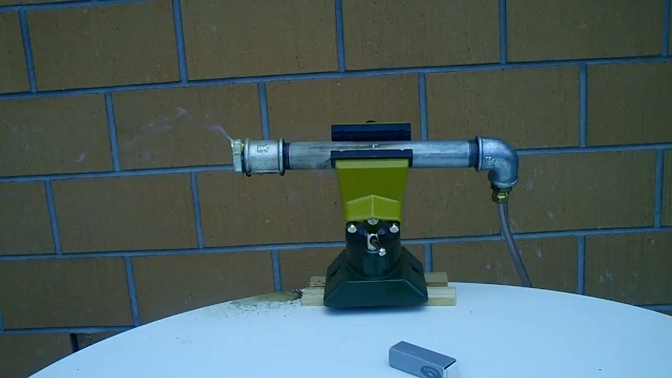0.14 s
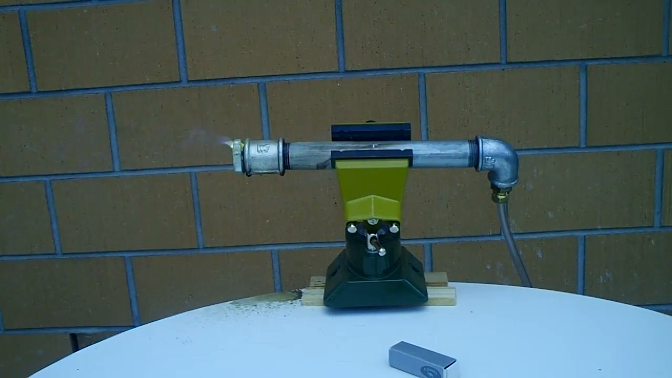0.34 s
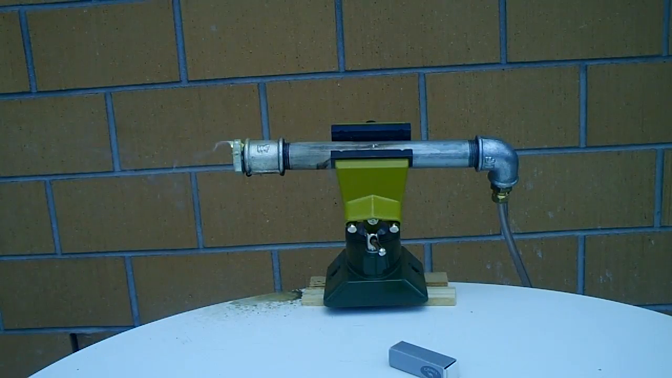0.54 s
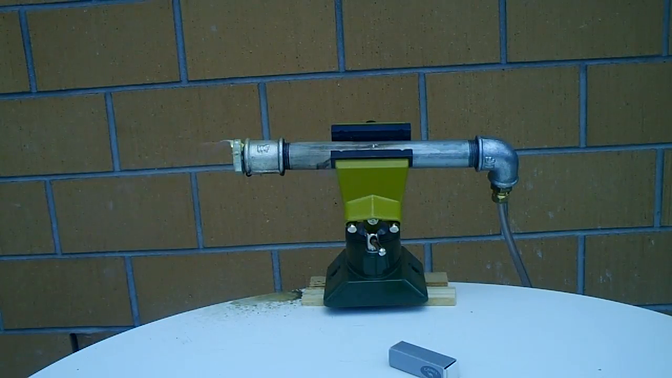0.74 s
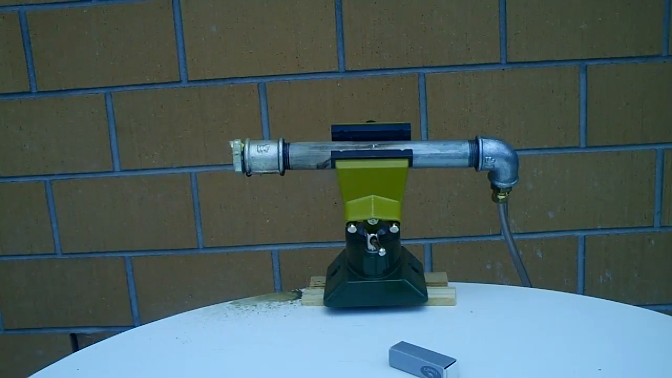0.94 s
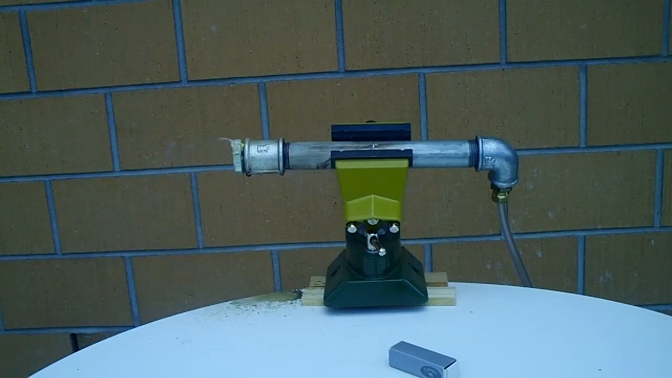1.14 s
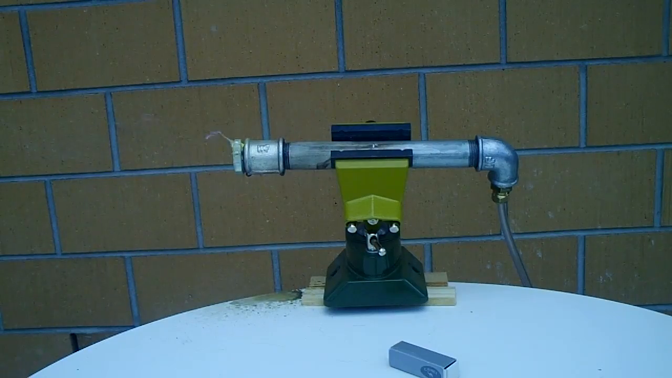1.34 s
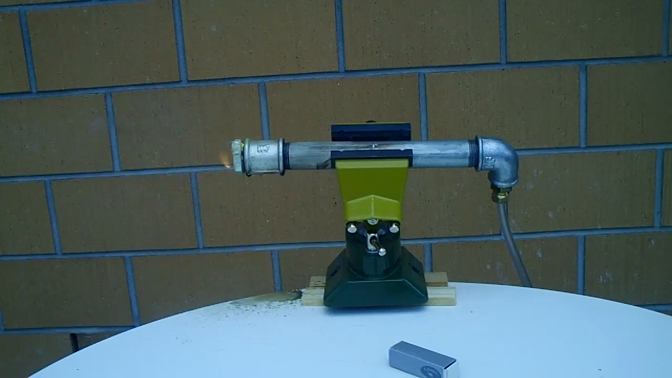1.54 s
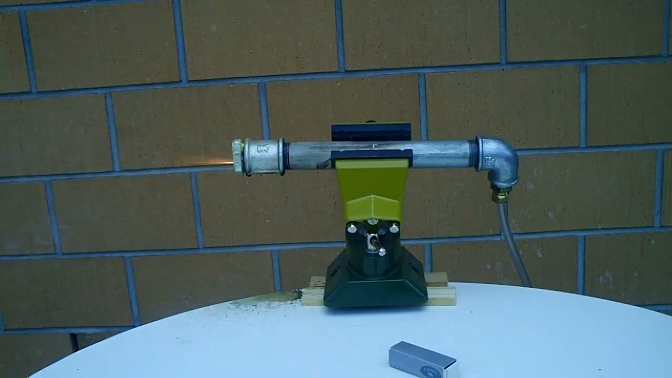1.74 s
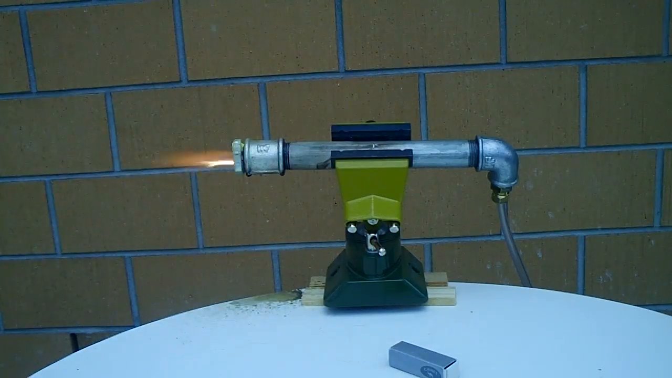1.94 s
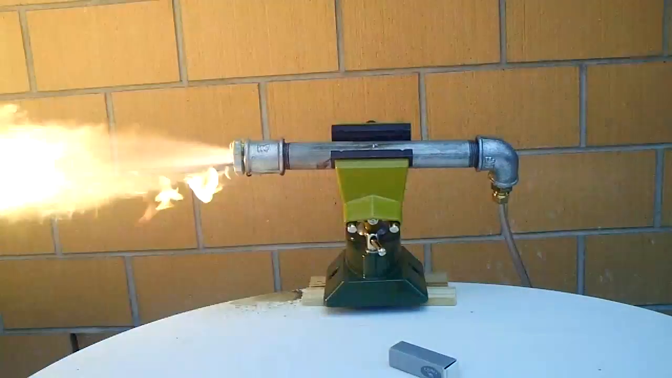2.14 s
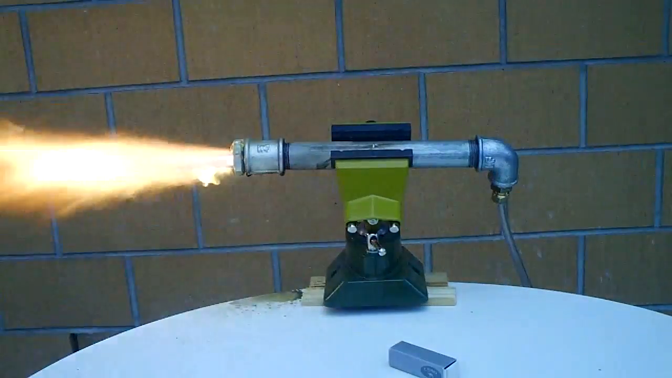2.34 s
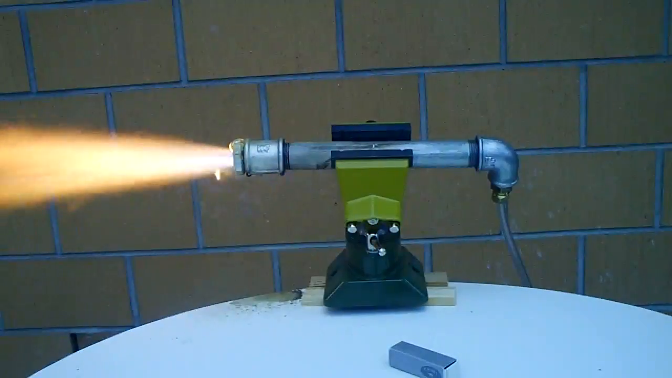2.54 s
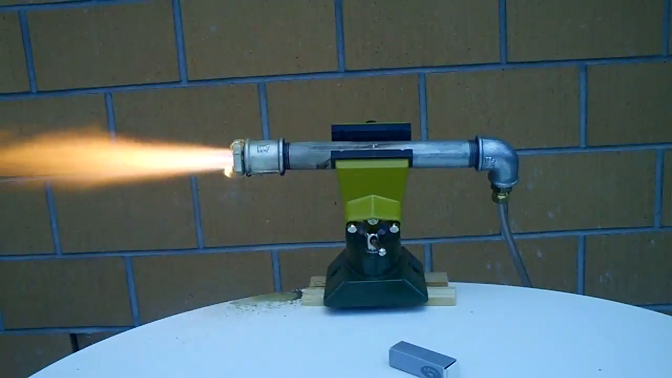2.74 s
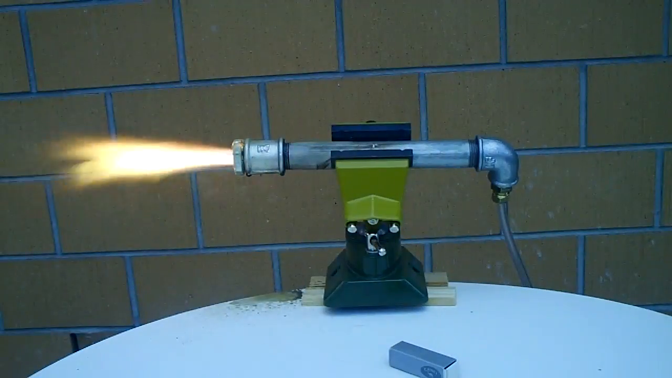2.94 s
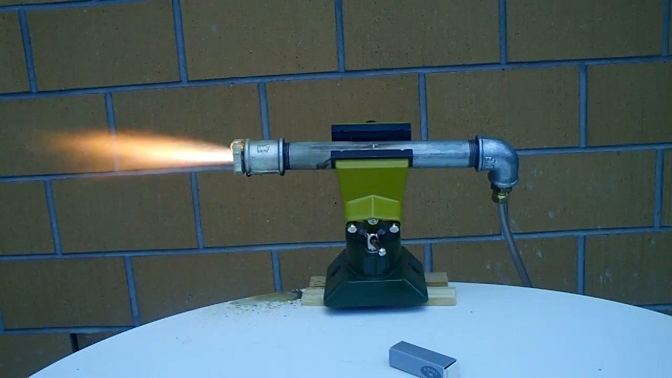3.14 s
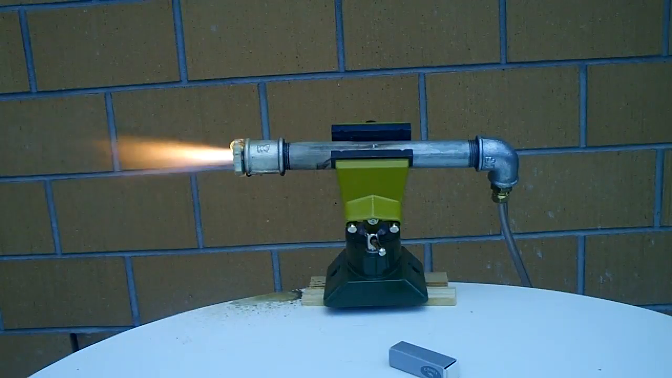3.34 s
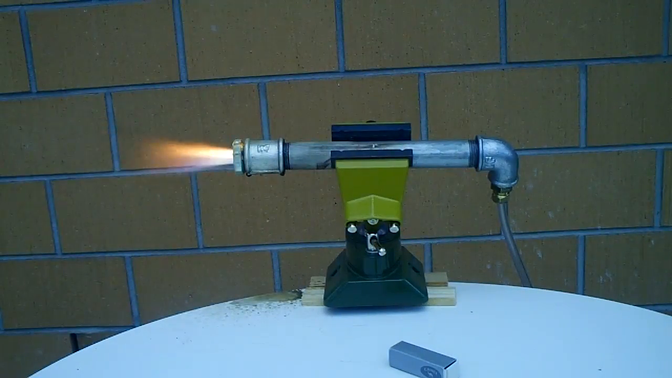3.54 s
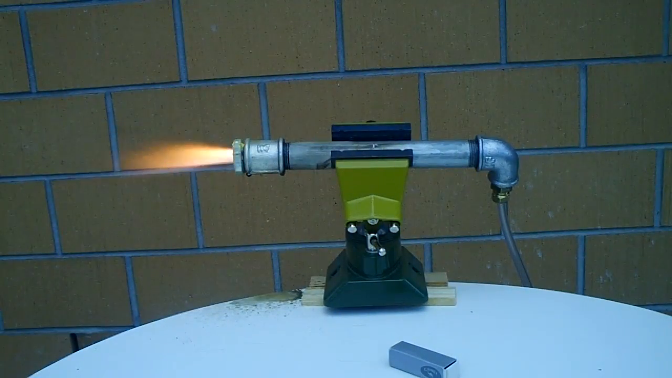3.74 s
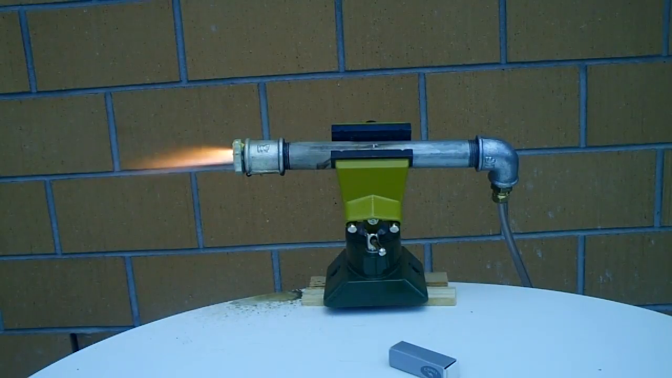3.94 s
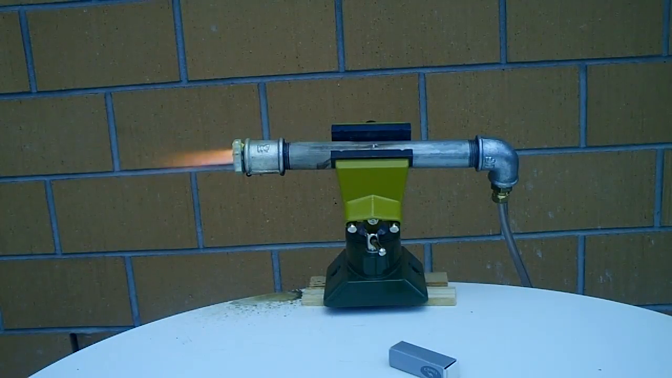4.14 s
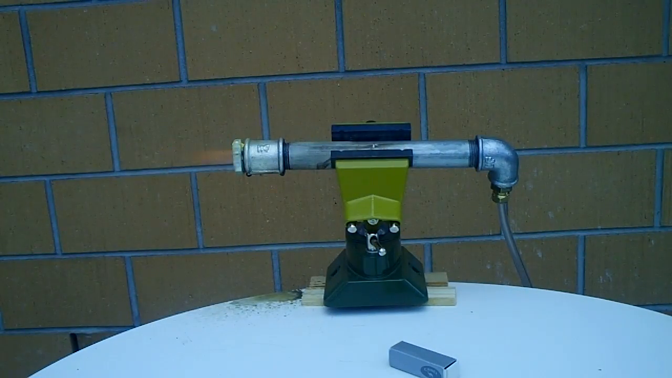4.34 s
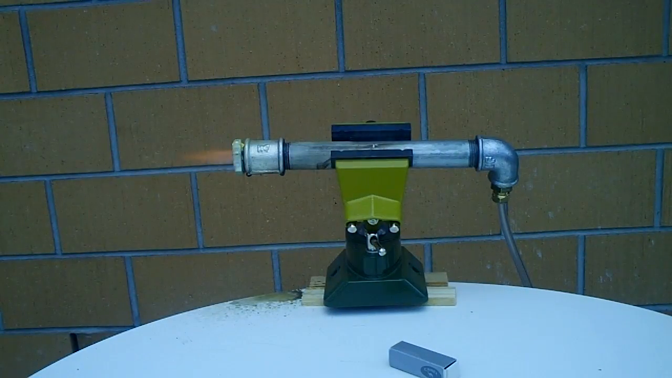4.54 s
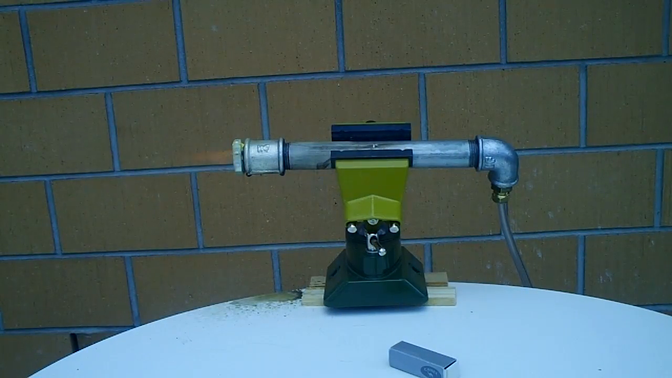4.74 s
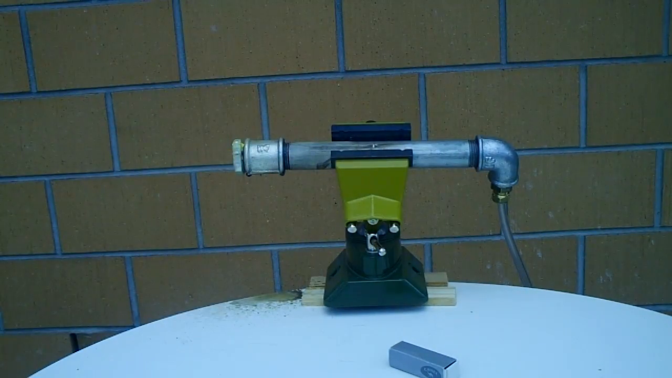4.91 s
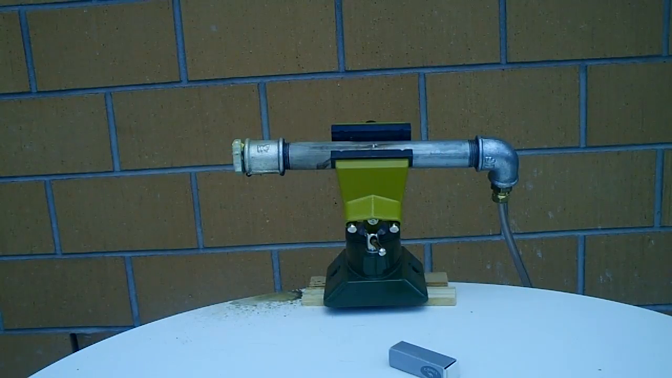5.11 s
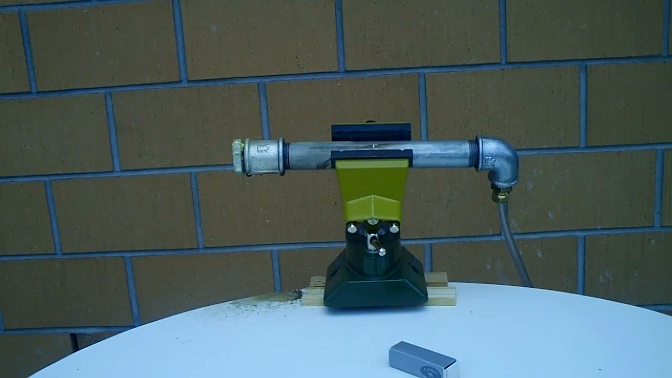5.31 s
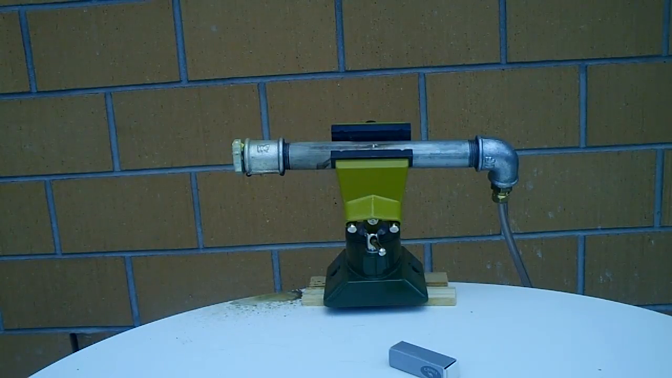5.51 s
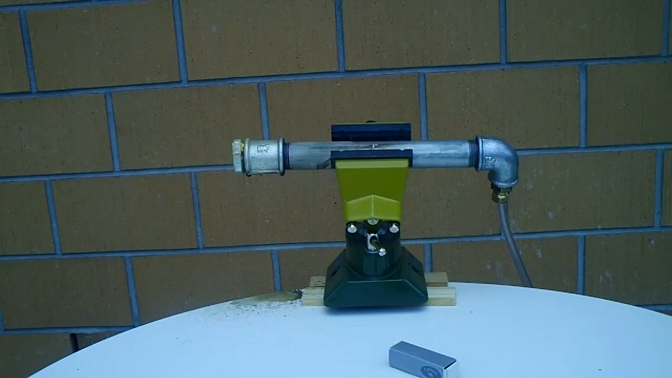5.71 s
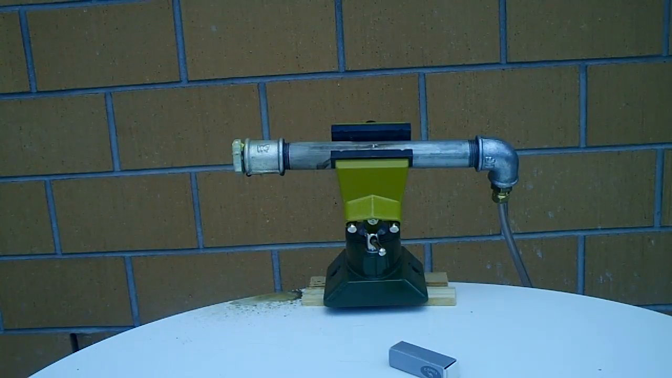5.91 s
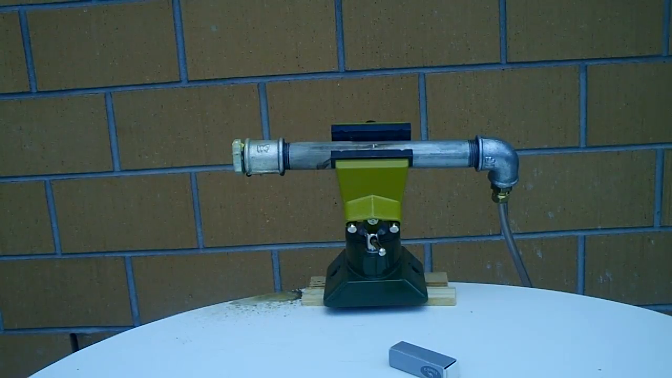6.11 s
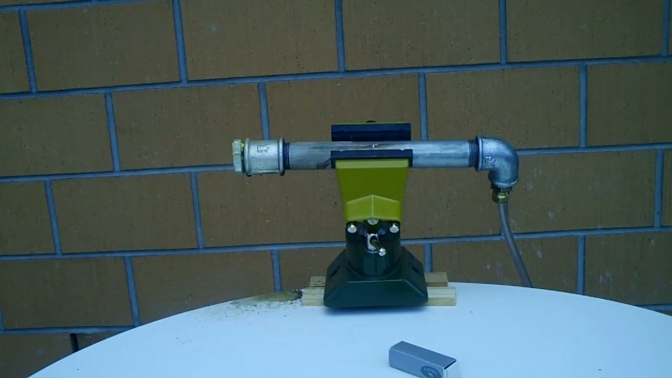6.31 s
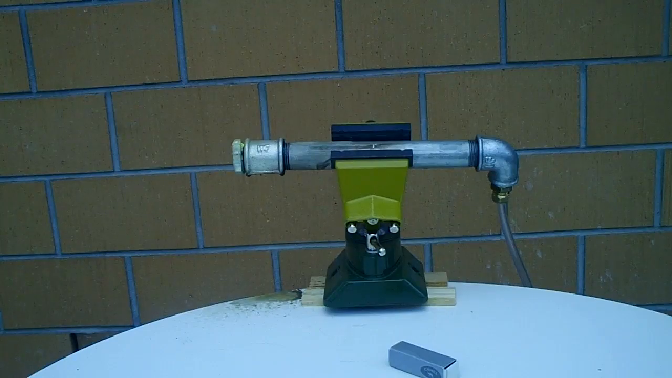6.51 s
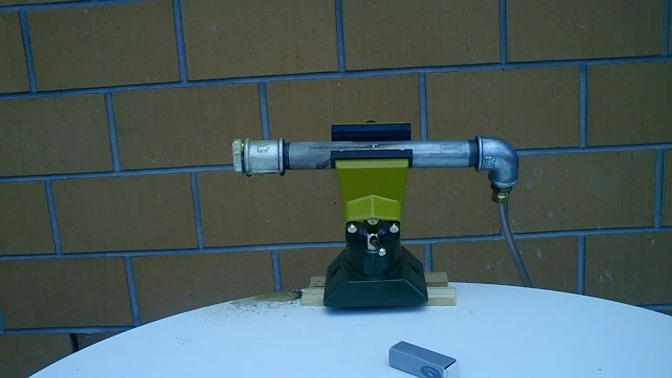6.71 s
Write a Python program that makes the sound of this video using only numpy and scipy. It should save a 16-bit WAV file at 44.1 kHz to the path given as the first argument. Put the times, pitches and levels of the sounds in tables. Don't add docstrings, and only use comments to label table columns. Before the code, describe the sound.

Outdoors by a brick wall, quiet far traffic with a soft knock and faint fuse ticks. A breathy gas hum builds, then a low puff, quick cracking pops and short whistles lead into a full roaring, hissing jet. Very close to a small mono microphone, it overloads and distorts. The blast weakens and flutters, its whistling note sinking, then it cuts off with a few breathy gasps.

```python
import sys
import numpy as np
from scipy import signal
from scipy.fft import rfft, irfft, next_fast_len
from scipy.io import wavfile
from scipy.ndimage import uniform_filter1d, map_coordinates

SR = 44100
rng = np.random.default_rng(int(sys.argv[2]) if len(sys.argv) > 2 else 0)


def ratio_of_db(decibels):
    return 10 ** (np.asarray(decibels, float) / 20)


def waveform_to_disk(signal):
    frames = np.transpose(np.atleast_2d(signal))
    scaled = np.clip(frames, -1, 1) * 32767
    samples = np.round(scaled).astype(np.int16)
    wavfile.write(sys.argv[1], SR, samples)


N = 298116
TIME = np.arange(N) / SR

# time in seconds, gas flow in dB, flame size in dB.
BURN = [(1.6, -89, -77), (1.67, -58, -37), (1.72, -53, -38), (1.745, -47.5, -34), (1.785, -49, -36.5),
        (1.84, -37.5, -19.5), (1.94, -35.5, -16), (2.06, -19, -5.5), (2.12, -4, 1.5), (2.6, 3, 2),
        (3.8, 0.5, -0.5), (4.3, -5, -6.5), (5.3, -8.5, -11.5), (5.96, -10.5, -23.5), (6.06, -16, -25),
        (6.17, -41, -42.5), (6.32, -43, -41), (6.43, -72, -72)]


def exhaust():
    # pitch in Hz, level in dB per Hz.
    flame_colour = [(50, -43.5), (100, -16.5), (260, -3), (430, -5.5), (640, -3.5), (900, -9.5),
                    (1300, -14), (1500, -21), (2600, -18.5), (5000, -30), (11000, -53), (22000, -120)]
    # pitch in Hz, width in Hz, level in dB.
    boom = [(262, 18, -4.5), (523.5, 55, -1.5), (632, 39, 1), (882, 77, 2)]
    # pitch in Hz, level in dB per Hz.
    hiss_colour = [(700, -120), (900, -20), (1500, -8.5), (2600, -8), (3100, -2.5), (4160, -9), (4670, -7),
                   (5500, -2.5), (7000, -8.5), (8800, -0.5), (10300, -3.5), (11000, -3.5), (22000, -120)]
    # pitch in Hz, width in Hz, level in dB.
    nozzle = [(2770, 33, -7.5), (3643, 60, -2), (4743, 28, 4.5), (5330, 120, -3), (5706, 50, 0.5),
              (6350, 55, 2.5), (7240, 50, -3.5), (7680, 74, -3), (7940, 40, -1), (8300, 99, -2),
              (8630, 49, -0.5), (8990, 70, -5.5), (9560, 45, -16.5), (10300, 110, -1.5)]
    # pitch in Hz, width in Hz, level in dB.
    pipe_ring = [(1206.5, 180, -4.5), (2974, 120, -13.5), (931, 160, -7.5)]
    # time in seconds, pitch in Hz, level in dB over the gas flow.
    chamber_note = [(1.7, 2350, 4), (1.9, 2400, -8), (2.1, 2202, -6.5), (3.5, 2250, -4.5), (4.7, 2299, -5),
                    (5.4, 2078, -1.5), (5.85, 1942, -6.5), (5.97, 1780, -13.5), (6.15, 1740, -8.5)]
    # time in seconds, share from 0 to 1.
    cooling = [(4.4, 0), (5.3, 0.97)]

    flow_db, flame_db = curves(BURN)
    cooled = np.clip(np.interp(TIME, *np.transpose(cooling)), 0, 1)
    flare_db = flares()
    sputter_db = (0.6 + 1 * cooled) * wobble(48)
    flicker = wobble(18)
    lumps = ratio_of_db(1.0 * flicker + 1.33 * wobble(70))
    spits = ratio_of_db(0.57 * flicker + 0.8 * wobble(260))

    def roar_tone(f):
        return ratio_of_db(along(flame_colour, f)) * bumps(boom, lift_db=4)(f)

    def hiss_tone(f):
        return ratio_of_db(along(hiss_colour, f)) * bumps(nozzle, lift_db=6)(f)

    roar = ratio_of_db(flame_db + flare_db + sputter_db) * unit(lumps * rush(roar_tone, patchy_db=1.5))
    jet_share = 0.3
    hiss = ratio_of_db(flow_db + jet_share * flare_db) * unit(spits * rush(hiss_tone, patchy_db=1.5))

    ring_db = -6 + 0.93 * flow_db - 5.5 * cooled + 1 * wobble(25)
    ring = unit(lumps * rush(sharp(pipe_ring), patchy_db=1.5)) * (flow_db > -120)

    hot = fuzzy(chamber_note, width_hz=297)
    clear = ratio_of_db(1.2 * wobble(45)) * fuzzy(chamber_note, width_hz=115)
    overtone_db = -10.5 + 12 * np.clip(TIME - 5.6, 0, 1)
    clear = clear + ratio_of_db(overtone_db) * fuzzy(chamber_note, width_hz=130, order=2.87)
    note = lumps * (np.sqrt(1 - cooled) * hot + np.sqrt(cooled) * clear)
    return roar + hiss + ratio_of_db(ring_db) * ring + ratio_of_db(flow_db) * note


def flares():
    # time of the flare in seconds, height in dB.
    flare_events = [(1.845, 7), (1.943, 3.5), (2.11, 3), (2.424, 5.5), (2.678, 4.5), (3.69, 5), (3.75, 2),
                    (4.556, 5), (4.625, 12), (4.78, 5), (4.87, 5.5), (5.084, 3), (5.223, 4.5), (5.278, 3),
                    (5.348, 3.5), (5.458, 5), (5.639, 6), (5.67, 5), (5.712, 9)]
    choke_s, rise_s, fall_s = 0.018, 0.008, 0.022
    choke_share = 0.7
    shape_s = np.array([-2 * choke_s, -choke_s / 2, rise_s, rise_s + fall_s])
    return sum(db * np.interp(TIME - s, shape_s, [0, -choke_share, 1, 0]) for s, db in flare_events)


def pops():
    # time in seconds, peak in dB, thump in dB, crack in dB.
    ignitions = [
        (1.7244, -14, -4, -3.5),
        (1.811, -12.5, -1, -9),
        (1.8313, -9.5, -4, -3),
        (1.851, -2, -2, -11.5),
        (1.877, -10, 4.5, -11.5),
        (1.889, -16, 0, -16.5),
    ]
    push, crack = np.zeros(N), np.zeros(N + SR)
    t = np.arange(SR // 10) / SR
    for s, db, thump_db, crack_db in ignitions:
        start = round(s * SR)
        push[start] = ratio_of_db(db + thump_db + 21.5)
        fade_db = db + crack_db + 6 - 60 * t / 0.035
        crack[start:][:len(t)] += ratio_of_db(fade_db) * rng.standard_normal(len(t))
    # pitch in Hz, width in Hz, level in dB.
    low = [(538, 150, 7), (1170, 79, -14)]
    high = [(1170, 110, 2), (2330, 220, 3), (3000, 150, -10), (5600, 2000, -19), (9000, 3000, -18)]
    return filtered(push, lambda f: modes(low, f)) + filtered(crack[:N], lambda f: modes(high, f))


def puff():
    s, db, hz = (1.664, -19, 70)
    t = np.clip(TIME - s, 0, None)
    rumble = np.sin(2 * np.pi * hz * t) + 0.94 * rush(lambda f: 1 / (1 + (f / 600) ** 4), patchy_db=1.5)
    return ratio_of_db(db - 60 * t / 0.12) * (1 - np.exp(-t / 0.0059)) * rumble


def singing():
    # start in seconds, length in seconds, first pitch in Hz, last pitch in Hz, level in dB.
    sung_notes = [
        (1.565, .045, 920, 790, -50),
        (1.58, .03, 445, 405, -39),
        (1.607, .035, 404, 355, -34),
        (1.722, 0.053, 1166, 1136, -31.5),
        (1.73, .07, 2330, 2300, -48),
        (1.73, .07, 2980, 2980, -50),
        (1.777, .085, 2420, 2450, -38.5),
        (1.795, .065, 1190, 1290, -31),
        (1.957, .075, 1600, 1615, -28),
    ]
    out = np.zeros(N)
    for s, length, from_hz, to_hz, db in sung_notes:
        hz = np.interp(TIME, [s, s + length], [from_hz, to_hz])
        edge_s = 0.012
        gate = np.clip(np.minimum(TIME - s, s + length - TIME) / edge_s + 0.5, 0, 1) ** 2
        turn = 2 * np.pi * np.cumsum(hz * (1 + 0.02 * wobble(90))) / SR
        out += gate * ratio_of_db(db + 3 + 3.5 * wobble(80)) * np.sin(turn)
    return out


def cold_gas():
    # pitch in Hz, width in Hz, level in dB.
    low_modes = [(369, 107, 11), (540, 230, -7), (210, 150, -8)]
    # pitch in Hz, width in Hz, level in dB.
    upper_modes = [(1190, 150, 2), (1870, 150, 2), (2450, 120, -6), (3350, 280, -8)]
    # time in seconds, peak in dB.
    last_gasps = [
        (6.14, -24.5),
        (6.24, -27),
        (6.32, -27),
    ]

    leak_db = -62.5 + 5 * TIME
    hum_from_s, lit_s = 1.28, 1.625
    hum_db = -46.5 - 40 * np.clip(hum_from_s + 0.24 - TIME, 0, None)
    lit_drop_db = 600 * np.clip(TIME - lit_s, 0, 0.2)
    leak = ratio_of_db(np.maximum(leak_db, hum_db) - lit_drop_db)
    gasps = swells(*np.transpose(last_gasps), rise_s=0.065, fall_s=0.072)
    hum = rush(sharp(low_modes), patchy_db=1.5)
    whistle = rush(sharp(upper_modes), patchy_db=1.5)
    return (leak + gasps) * hum + gasps * ratio_of_db(-14) * whistle


def sparks():
    # time in seconds, level in dB, pitch in Hz, seconds to fade by 60 dB.
    ticks = [
        (.229, -64, 7500, .02),
        (.383, -60, 7800, .12),
        (.39, -60, 4930, .1),
        (.895, -53, 5600, .025),
        (1.297, -51.5, 6300, .05),
        (1.325, -60, 5200, .12),
        (6.559, -60, 6450, .03),
    ]
    out, t = np.zeros(N + SR), np.arange(SR // 8) / SR
    for s, db, hz, t60 in ticks:
        burst = np.sin(2 * np.pi * hz * t) * uniform_filter1d(rng.standard_normal(len(t)), size=14)
        envelope = ratio_of_db(db + 10 - 60 * t / t60) * (1 - np.exp(-t * 1500))
        out[round(s * SR):][:len(t)] += envelope * burst
    return out[:N]


def bump():
    s, db, hz = (.13, -43, 105)
    t = np.clip(TIME - s, 0, None)
    return ratio_of_db(db - 60 * t / 0.2) * (1 - np.exp(-t / 0.01)) * np.sin(2 * np.pi * hz * t)


def yard():
    # pitch in Hz, level in dB per Hz.
    traffic_colour = [(35, -51.5), (60, -10), (140, -2), (169, -2.5), (201, -7), (282, -7), (387, -6.5),
                      (579, -15.5), (716, -13.5), (1140, -10), (1710, -30), (2110, -26.5), (3290, -37),
                      (4820, -36.0), (9500, -36.0), (12400, -68), (20900, -120)][:-2] + [(11000, -35.5)]
    # pitch in Hz, level in dB per Hz.
    push_colour = [(5, -39.5), (12, -15), (25, -5), (48, 6.5), (70, -7), (110, -17), (200, -64),
                   (400, -120)]
    # time in seconds, peak in dB, seconds to climb or fall by 20 dB.
    gust_events = [(0, -43, 0.1), (.8, -49, .15), (1.36, -45.5, .2), (1.68, -32.5, 0.12), (1.9, -40, .3),
                   (2.8, -8.5, 0.31), (3.22, -22, 0.2), (3.43, -18, .08), (3.73, -20.5, 0.1),
                   (3.97, -17, 0.2), (4.5, -22.5, 0.13), (4.63, -20, .06), (4.8, -16, 0.14),
                   (5.2, -25.5, .2), (5.5, -26, .05), (5.69, -26.5, 0.02), (6.55, -52, 0.3)]

    traffic_db = YARD_DB = -50.5 - 0.22 * TIME - 1.5 + 0.8 * wobble(2.3)
    traffic = ratio_of_db(traffic_db) * rush(lambda f: ratio_of_db(along(traffic_colour, f)), patchy_db=-0.2)
    s, db, length = np.transpose(gust_events)
    calm = ratio_of_db(-58)
    draught = ratio_of_db(-30.5 + 1.1 * curves(BURN)[0])
    air = calm + draught + swells(s, db, length, length)
    return traffic + air * rush(lambda f: ratio_of_db(along(push_colour, f)), patchy_db=-0.5)


def whine():
    steady = ratio_of_db(-83) * np.sin(2 * np.pi * 5771 * TIME)
    dip = np.clip(np.sin(2 * np.pi * 30 * TIME), 0, 1)
    hz = 10230 - 190 * dip + 25 * wobble(40)
    return steady + ratio_of_db(-74.5) * np.sin(2 * np.pi * np.cumsum(hz) / SR)


def unit(x):
    return x / np.sqrt(np.mean(x ** 2) + 1e-20)


def along(points, hz):
    f, v = np.transpose(points)
    return np.interp(np.log(hz + 1), np.log(f + 1), v)


def curves(rows):
    s, *cols = np.transpose(rows)
    return [np.interp(TIME, s, c, left=-120, right=-120) for c in cols]


def wobble(rate):
    knots = rng.standard_normal(int(N * rate / SR) + 4)
    return map_coordinates(knots, [np.arange(N) * rate / SR])


def filtered(x, response):
    m = next_fast_len(N + SR // 2)
    spectrum = rfft(x, m) * response(np.fft.rfftfreq(m, 1 / SR))
    return irfft(spectrum, m)[..., :N]


def modes(table, f):
    total = 0
    for k, (c, w, db) in enumerate(table):
        damping = 1j * f * w
        total = total + (-1) ** k * ratio_of_db(db) * damping / (c * c - f * f + damping + 1e-9)
    return total


def bumps(table, lift_db):
    return lambda f: np.sqrt(1 + sum(np.abs(ratio_of_db(lift_db) * modes([m], f)) ** 2 for m in table))


def sharp(table):
    def response(f):
        return np.sqrt(sum(ratio_of_db(db) ** 2 * np.abs(modes([(c, w, 0)], f)) ** 4 for c, w, db in table))
    return response


def rush(response, patchy_db):
    z = signal.stft(rng.standard_normal(N), nperseg=512)[2]
    field = uniform_filter1d(rng.standard_normal(z.shape), size=6, axis=0)
    field = uniform_filter1d(field, size=8, axis=1)
    patchy = signal.istft(z * ratio_of_db(patchy_db * unit(field)), nperseg=512)[1][:N]
    return unit(filtered(patchy, response))


def fuzzy(table, width_hz, order=1):
    hz, db = curves(table)
    breath = filtered(rng.standard_normal((2, N)), lambda f: 1 / (1 + (f / width_hz) ** 2))
    turn = 2 * np.pi * np.cumsum(order * hz) / SR
    return ratio_of_db(db) * unit(breath[0] * np.cos(turn) + breath[1] * np.sin(turn))


def swells(s, db, rise_s, fall_s):
    gap = np.arange(0, N, 32) / SR - np.asarray(s)[:, None]
    rise, fall = np.reshape(rise_s, (-1, 1)), np.reshape(fall_s, (-1, 1))
    slope = np.where(gap < 0, -gap / rise, gap / fall)
    gain = ratio_of_db(np.asarray(db)[:, None] - 20 * slope).sum(axis=0)
    return np.repeat(gain, 32)[:N]


def scene():
    motor = exhaust() + pops() + puff() + singing() + cold_gas() + sparks()
    mono = motor + bump() + yard() + whine()
    return np.array([mono, mono])


def band_limit(x):
    return signal.sosfilt(signal.butter(12, 15610, fs=SR, output="sos"), x)


def record(dry):
    # pitch in Hz, gain in dB.
    rebuild = [(20, 0.5), (9000, -1), (10200, -5.5), (11000, -8.5), (11800, -22.5), (12500, -45),
               (15000, -42.5), (20000, -60.5)]
    ceiling = 0.71
    half = filtered(dry, lambda f: np.clip((SR / 4 - f) / 60, 0, 1))
    half = np.clip(half, -ceiling, ceiling)
    half = 2 * half * (np.arange(N) % 2 == 0)
    full = filtered(half, lambda f: ratio_of_db(along(rebuild, f)))
    return band_limit(np.clip(full, -ceiling, ceiling))


dry = scene()
out = record(dry)
waveform_to_disk(out)
```